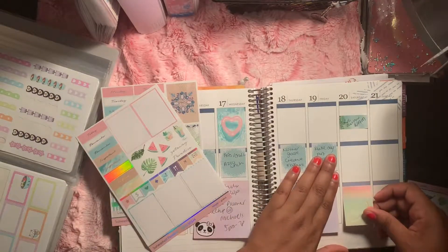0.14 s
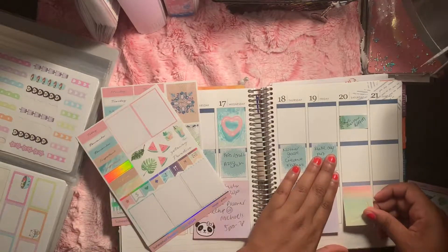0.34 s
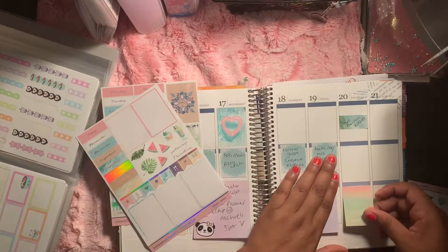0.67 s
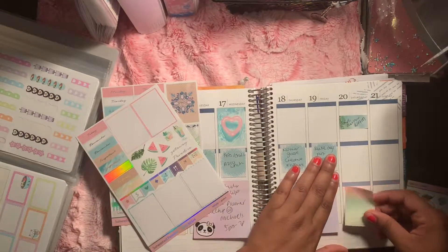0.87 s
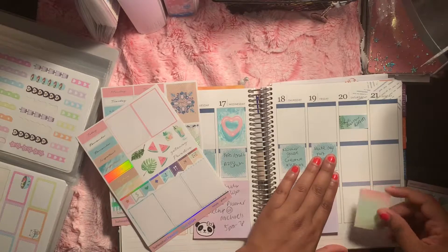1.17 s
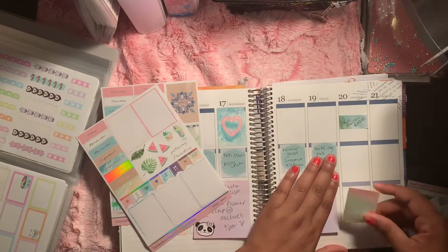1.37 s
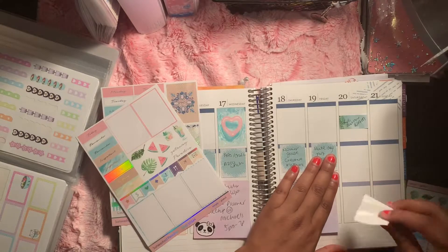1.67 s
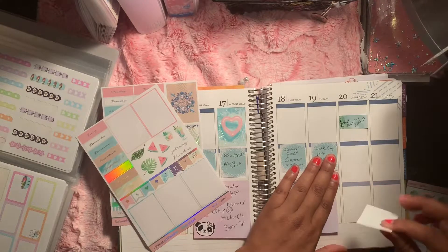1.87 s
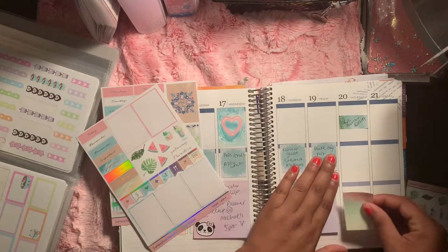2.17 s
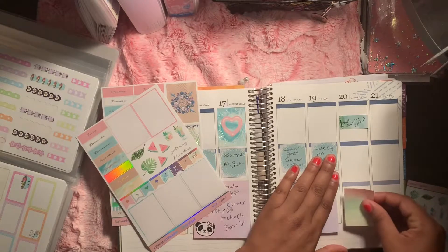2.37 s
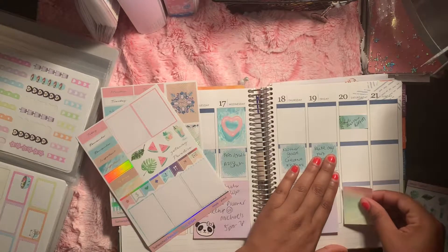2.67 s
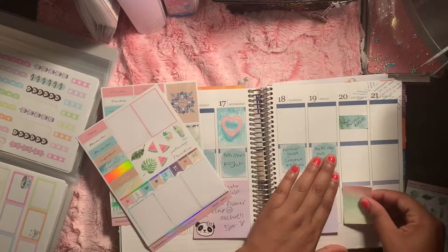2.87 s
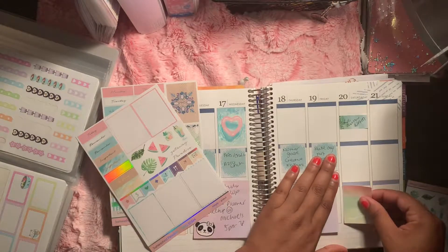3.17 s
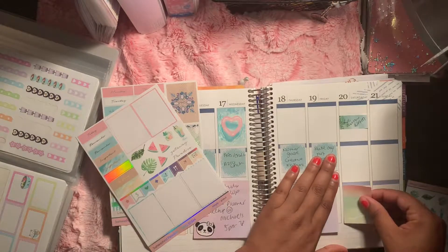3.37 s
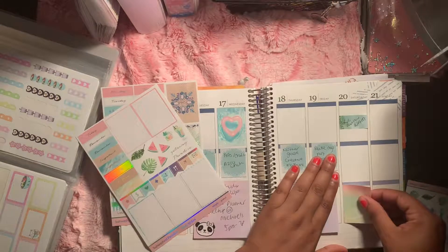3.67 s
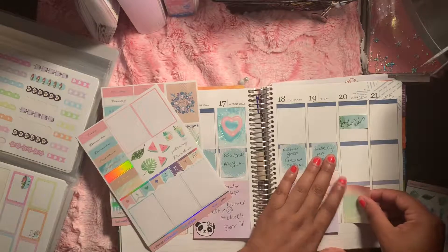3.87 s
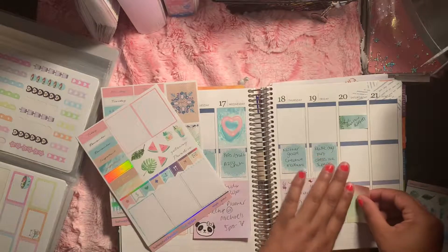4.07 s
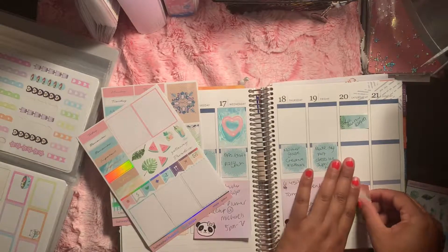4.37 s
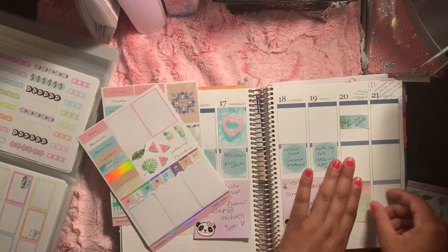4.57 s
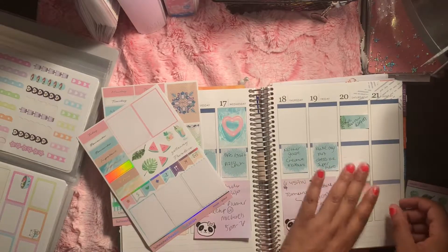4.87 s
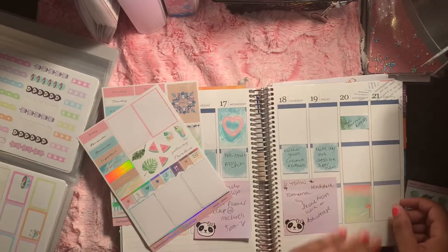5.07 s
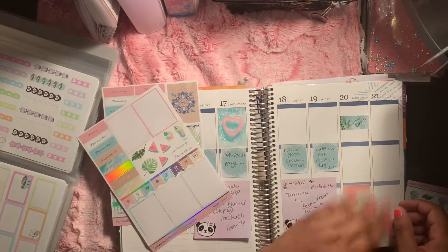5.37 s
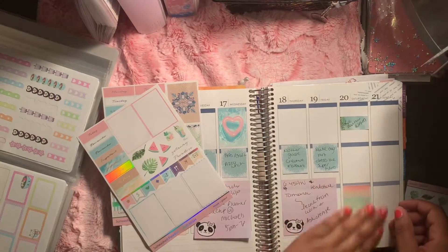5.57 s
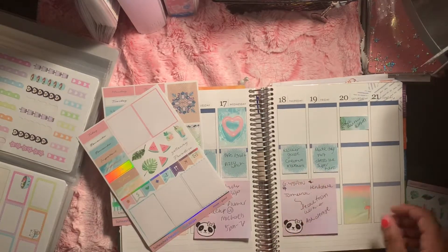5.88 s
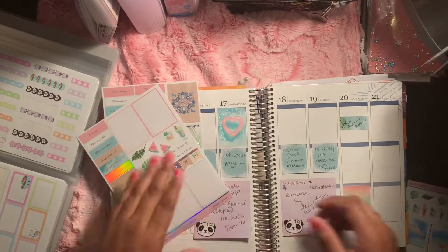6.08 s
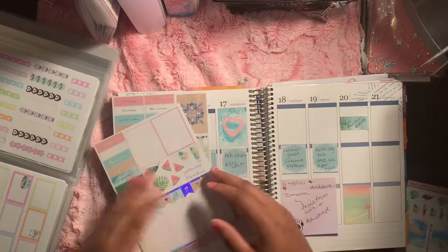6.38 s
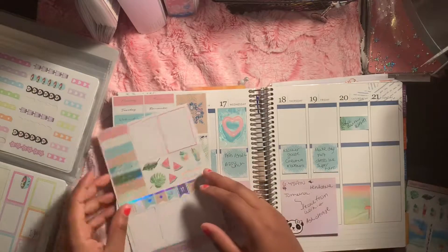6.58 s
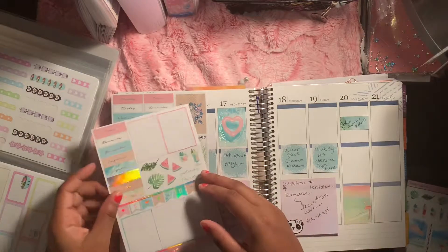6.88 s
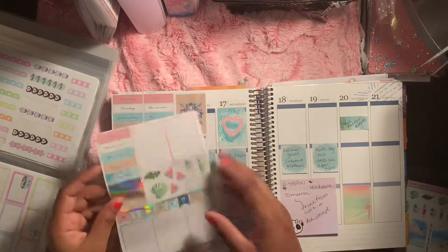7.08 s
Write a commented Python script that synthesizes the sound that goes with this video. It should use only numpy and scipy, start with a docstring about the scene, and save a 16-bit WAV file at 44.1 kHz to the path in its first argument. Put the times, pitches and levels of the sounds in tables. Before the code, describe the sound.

A quiet indoor room with a low, faintly beating motor and mains hum and soft airy room tone; paper is handled close to a stereo microphone, dry with only tiny reflections. Faint ticks at 0.4 and 0.8 s lead to a crisp flick and brief scrape at 1.0. Around 1.65-2.0 a sticker peels with a thin, uneven sticky crackle and a sharp snap at 1.83. Then it is nearly still, with only tiny ticks until about 4. Soft sliding grows from 4.2, and two bright, hard snaps, the loudest ticks, land at 4.5 with a light bump. A smooth palm wipe runs 4.8-5.14, ending in a dull woody pat at 5.15. Another pat at 5.5 starts a shorter wipe, closed by a firmer pat at 5.7. From 6.2 a sheet slides, is lifted and flexed, with rustles, crinkles around 6.76, and hollow card ticks, the last cluster at 7.15.

```python
"""Paper, close up: a sticker is lifted, laid into a planner, smoothed down; then a sticker sheet is picked up.
Slides are filtered slip noise, ticks and crinkles short resonant bursts, peeling glue drives sticker modes.
A flat hand wipes the page twice and pats it three times; its impulses ring damped desk modes.
Behind it a motor and the mains hum together and beat, over the room tone of a quiet room."""
import sys
import numpy as np
from scipy import signal
from scipy.fft import rfft, irfft, next_fast_len
from scipy.io import wavfile

SR = 44100
rng = np.random.default_rng(int(sys.argv[2]) if len(sys.argv) > 2 else 0)


def master(y):
    """Save y as 16-bit WAV."""
    cut = np.clip(np.atleast_2d(y).T, -1, 1)
    pcm = np.round(cut * 32767)  # scale
    wavfile.write(sys.argv[1], SR, pcm.astype(np.int16))


N = 319284
TIME_S = np.arange(N) / SR

# motor turn rate and double, mains, building drone: (frequency [Hz], relative level [dB])
HUM = [(38.1, -65), (49.0, -68), (58.8, -57), (117.42, -60), (120.0, -59), (240.0, -88)]
# room tone spectrum: (frequency [Hz], relative density [dB])
ROOM_TONE = [(20, -14), (32, -7), (45, -1.5), (70, .5), (95, -8.5), (150, -14), (200, -26), (300, -29.5),
             (600, -41), (1200, -47), (2500, -52), (6000, -54.5), (14000, -58)]
HUM_SWELL_S = .075   # all hum partials in phase

# flicked paper edges and fingernails: (time [s], crisp level [dB], hollow card level [dB], card ring [dB],
# crack t60 [s], edge ring [Hz], card ring [Hz], high-pass of the flexing piece [Hz])
TICKS = [(0.412, -50, -65, -63, 0.0068, 5250, 1680, 1290), (0.76, -42, -56, -51, 0.0064, 14900, 1660, 1400),
         (1.026, -27, -43, -31.5, 0.0046, 10600, 2580, 1500),
         (1.029, -57, -44.5, -51, 0.0036, 5800, 1880, 1400),
         (1.222, -50.5, -68, -55, 0.0034, 13300, 2230, 1200),
         (1.833, -24.5, -47, -50.5, 0.015, 14300, 1900, 1390),
         (1.8383, -44, -68, -39.5, 0.0033, 3700, 767, 1000),
         (1.933, -54.5, -64.5, -80, 0.0049, 4200, 2400, 1200), (1.96, -66, -59, -63, .004, 3800, 1270, 496),
         (2.142, -59.5, -72, -57, 0.009, 8500, 2520, 1500),
         (2.653, -80, -58.5, -51, 0.0052, 3500, 1930, 437),
         (2.729, -44.5, -54, -41, 0.011, 8400, 3540, 590),
         (3.072, -57.5, -76, -75, 0.0027, 7200, 2600, 1100),
         (3.951, -56, -74, -74, 0.0022, 7100, 3020, 1500), (4.374, -45, -62.5, -60, .008, 6800, 3470, 2400),
         (4.398, -44.5, -70, -51, 0.0076, 10600, 3300, 1510),
         (4.5082, -16.5, -49, -45, 0.0041, 6750, 1960, 1010),
         (4.5475, -8, -46, -37, 0.0023, 8100, 2100, 880), (4.614, -72.5, -92, -39, 0.0022, 4400, 825, 400),
         (6.169, -52, -60, -65.5, 0.005, 7050, 2300, 1410), (6.653, -70, -80, -48, .004, 4400, 1100, 800),
         (6.705, -36, -53, -48, 0.0063, 6600, 930, 725), (6.748, -65, -53, -42, .004, 6200, 1300, 610),
         (6.7656, -42, -39.5, -30, 0.015, 10100, 2655, 1000),
         (6.808, -41, -52.5, -58, 0.011, 10300, 3100, 1100),
         (6.839, -54, -64, -38.5, 0.004, 6000, 1090, 810),
         (6.878, -69, -49.5, -44.5, .006, 2900, 1960, 500), (7.035, -68, -74, -45, 0.0044, 2400, 900, 700),
         (7.146, -51, -65, -28.5, 0.0055, 7000, 1350, 1000),
         (7.1527, -65, -65, -24.5, 0.0071, 3200, 1030, 700),
         (7.1531, -57, -51, -27, 0.0045, 3200, 1960, 920)]
# crack and card spectra: (frequency [Hz], relative density [dB])
SNAP_SPECTRUM = [(600, -32.5), (1500, -37), (2800, -13.5), (4000, -0.5), (5500, 5.5), (8500, 4), (11500, 3),
                 (15000, 0.5)]
CARD_SPECTRUM = [(150, -1), (400, 14.5), (800, -1), (1800, 1), (2600, -5), (4200, 2), (8000, -58),
                 (15000, -34)]
TICK_T60_S, RELEASE_DB = .03, 11   # weak tail of the crack; instant of release

# paper over paper: (fastest moment [s], rise [s], fall [s], smooth hiss [dB], dry rasp [dB],
# brightness of the hiss [dB], ring of the sheet [Hz])
SLIDES = [(0.885, 0.03, 0.03, -77, -69, 1, 3430), (0.955, 0.055, 0.035, -62.5, -61.5, -14, 2060),
          (1.007, 0.017, 0.017, -43.5, -52, 3, 3500), (1.035, 0.017, 0.074, -63.5, -76, -1, 1860),
          (1.179, 0.024, 0.038, -69.5, -79.5, 1, 2360), (1.315, 0.056, 0.041, -68.5, -88, 9, 3500),
          (1.784, 0.11, 0.13, -61.5, -80, 0, 3820), (1.98, 0.036, 0.029, -70, -65, 6, 3760),
          (2.08, 0.24, 0.082, -79.5, -86, 0, 1990), (4.0, 0.32, 0.18, -76, -98, 7, 3000),
          (4.22, 0.25, 0.21, -72.5, -77, -4, 2966), (4.415, 0.058, 0.064, -55, -71, -6, 3300),
          (4.54, 0.1, 0.11, -48.5, -63.5, -1.5, 1870), (4.73, 0.12, 0.07, -64.5, -69.5, -3, 3000),
          (6.225, .04, .055, -51.5, -60, -2, 2200), (6.28, .075, .048, -47.5, -56, -2, 3500),
          (6.421, 0.077, 0.079, -63, -73.5, -3, 1900), (6.572, 0.026, 0.11, -55, -65, -3, 1500),
          (6.62, 0.051, 0.11, -62.5, -62.5, -7, 4000), (6.763, 0.058, 0.031, -54, -59, -12, 1900),
          (6.872, 0.066, 0.071, -65, -61.5, 14, 1550), (6.985, 0.069, 0.082, -62.5, -60.5, 4, 1880),
          (7.08, 0.075, 0.061, -62.5, -57.5, -9, 3300), (7.135, 0.043, 0.04, -57.5, -64.5, -27, 1400)]
# flat hand wiping: (start [s], length [s], settled hiss [dB], hiss at the start [dB])
WIPES = [(4.794, 0.348, -52.5, -72), (5.476, 0.231, -55.5, -43.5)]
# smooth hiss and dry rasp spectra: (frequency [Hz], relative density [dB])
HISS_SPECTRUM = [(600, -32), (1500, -26), (3000, -16), (4200, -6), (5300, 2), (6200, -1), (7500, -2),
                 (9000, 0), (12500, -4.5), (15700, -2), (17500, -25)]
RASP_SPECTRUM = [(200, -20.5), (500, -8.5), (850, -5), (1200, 1.5), (2000, 0), (2800, 0), (4000, 4.5),
                 (5500, -3), (8000, -14), (15000, -32)]
SLIDE_EDGE_DB, SLIDE_ROUNDNESS = -23, 1.59   # level at ends of rise and fall; 1 = pointed top, 2 = bell
WIPE_ATTACK_S, WIPE_SETTLE_S, WIPE_RELEASE_T60_S = 0.017, 0.065, 0.029
WIPE_RASP_DB, WIPE_BRIGHT_DB = -11.5, 5   # page rasp re hiss; upper re lower part of the hiss
WIPE_RING_HZ = 2400   # page under the hand
SHEET_RING_DB, SHEET_WIDTH_HZ = 10, 340   # ring re rasp; bandwidth
SHEET_BEND = .06   # relative wander of the ring's pitch
CREASES_PER_S, CREASE_DB = 160, -5

# glue letting go: (fastest moment [s], rise [s], fall [s], level [dB], pitch re sticker modes [ratio])
PEELS = [(.955, .05, .04, -73, 1.4), (1.66, 0.062, 0.061, -68.5, 1.03), (1.78, 0.073, 0.055, -54.5, 1.04),
         (1.84, 0.014, 0.058, -59, 0.81), (1.99, 0.022, 0.046, -66.5, .63), (4.575, 0.04, 0.054, -52, 0.99)]
# loose sticker modes: (frequency [Hz], bandwidth [Hz], level [dB])
STICKER_MODES = [(700, 260, -1), (1650, 210, -2), (3605, 300, 5), (3900, 330, 2.5), (5300, 600, -2),
                 (6300, 500, 1.5), (8500, 240, 12), (9800, 730, 6), (13000, 1400, 0)]
STICKER_BEND = .025   # relative wander of pitch

# gripped, bent sheet: (busiest moment [s], rise [s], fall [s], level [dB])
CRINKLES = [(1.01, 0.004, .025, -64.5), (1.975, 0.016, 0.034, -79), (6.25, 0.18, 0.092, -64),
            (6.585, 0.033, 0.091, -66.5), (6.76, 0.034, 0.049, -52.5), (6.866, 0.058, 0.041, -59),
            (7.02, 0.073, 0.1, -62)]
CRINKLES_PER_S, CRINKLE_SPREAD_DB = 200, 3.5   # median rate; size spread

# hand parts or sheet edge landing on the planner: (time [s], thud [dB], slap [dB], contact time [s])
CONTACTS = [(4.125, -61.5, -64, 0.0028), (4.303, -49.5, -77, 0.0043), (4.511, -49.5, -84, 0.0032),
            (4.548, -54.5, -44.5, .00063), (4.811, -67, -62, 0.0014), (5.121, -49.5, -37, 0.0024),
            (5.134, -38.5, -40, 0.0026), (5.148, -33, -58, 0.0064), (5.485, -60, -41.5, 0.00058),
            (5.49, -30.5, -41.5, 0.0027), (5.502, -44, -36, 0.0011), (5.512, -32.5, -44, 0.014),
            (5.6862, -37.5, -34, 0.00033), (5.6986, -31, -37.5, 0.0016), (5.71, -26.5, -41.5, 0.0041),
            (7.15, -48, -43, 0.0002)]
# desk modes damped by the pages: (frequency [Hz], level [dB], t60 [s])
DESK_MODES = [(37.6, -22.5, 0.43), (57, -11.5, .2), (74, -3, 0.12), (121.3, -11.5, 0.26),
              (145.1, -4.5, 0.22), (181.3, -9, 0.12), (225, -13, 0.23), (270, -13, 0.11), (312, -3, 0.15),
              (353.5, -10.5, 0.19), (400.6, -9.5, 0.19), (451.4, -4, 0.1), (477, -5.5, .1),
              (640, -13.5, .04), (755, -12.5, .05), (1058, -3.5, 0.13), (1230, -8, 0.088),
              (1320, -13.5, 0.072), (1500, -10, .04)]
# dead thump of the page cushion: (frequency [Hz], level [dB], t60 [s])
PAGE_STACK = (330, 0, .022)
# slap spectrum: (frequency [Hz], relative density [dB])
SLAP_SPECTRUM = [(100, 4), (400, 5), (700, -1.5), (1200, -4), (1900, -11.5), (3100, -16.5), (4200, -15),
                 (7000, -18), (15000, -27.5)]
STRIKE_SPREAD_DB = 1.5   # mode levels, landing to landing
RUB_DB = -53.5   # desk shaken by the wiping hand, re its hiss

# desk top and nearby boxes: (delay [s], level [dB])
ECHOES = [(.0013, -27.5), (.00325, -24), (.0054, -32), (.0098, -16.5)]
ROOM_T60_S, ROOM_WET_DB = 0.041, -13
# lead of the left microphone over the right: (frequency [Hz], phase [rad])
MIC_PHASE = [(0, 0), (80, -.02), (150, -.1), (600, -.3), (900, -.8), (1100, -.1), (1600, 0), (3000, 1.3),
             (4850, 3.14), (9050, 9.42), (17400, 22)]
CUTOFF_HZ = 16200


def from_db(db):
    """Amplitude ratio of a level in dB."""
    return 10 ** (np.asarray(db) / 20)


def rms_one(x):
    """Scale to an rms of 1."""
    return x / np.sqrt(np.mean(x ** 2) + 1e-20)


def fade(t_s, t60_s):
    """Exponential decay by 60 dB in t60."""
    return np.exp(-np.log(1000) * t_s / t60_s)


def drift(knots_per_s):
    """Slow random wander: unit-spread Gaussian knots joined by lines."""
    knots = rng.standard_normal(N)
    return np.interp(TIME_S * knots_per_s, np.arange(N), knots)


def high_pass(x, hz):
    """Second-order Butterworth high-pass."""
    return signal.sosfilt(signal.butter(2, hz, "high", fs=SR, output="sos"), x)


def colour(x, spectrum):
    """Causal minimum-phase filter that follows a spectrum and keeps the power of white noise."""
    size = 2 * next_fast_len(N // 2 + 8192)
    hz, level_db = np.transpose(spectrum)
    grid_hz = np.arange(size // 2 + 1) * SR / size
    gain = rms_one(from_db(np.interp(np.log(grid_hz + 1), np.log(hz), level_db)))
    # folded cepstrum gives minimum phase
    cepstrum = irfft(np.log(gain))
    cepstrum[1:size // 2] *= 2
    cepstrum[size // 2 + 1:] = 0
    response = np.exp(rfft(cepstrum))
    return irfft(rfft(x, size) * response)[..., :N]


def ring(force, hz, t60_s):
    """Damped mode: a unit impulse starts a decaying sine of height 1."""
    r, w = fade(1 / SR, t60_s), 2 * np.pi * hz / SR
    return signal.lfilter([0, np.sin(w)], [1, -2 * r * np.cos(w), r * r], force + 1e-18)


def resonate(x, hz, width_hz):
    """Band-pass resonance with a peak gain of about 1."""
    r = np.exp(-np.pi * width_hz / SR)
    zeros = np.array([1, 0, -1]) * (1 - r * r) / 2
    poles = [1, -2 * r * np.cos(2 * np.pi * hz / SR), r * r]
    return signal.lfilter(zeros, poles, x)


def add(track, s, sound):
    """Mix a sound into the track in place, its middle at time s."""
    start = round(s * SR) - len(sound) // 2
    track[start:start + len(sound)] += sound[:N - start]


def burst(rise_t60_s, t60_s, tail_db, tail_t60_s):
    """Brief graze, then a noise flurry that dies fast over a weaker, slower tail."""
    t_s = np.arange(-SR // 4, SR // 4) / SR
    graze = from_db(-13.0) * fade(abs(t_s), rise_t60_s)
    flurry = fade(abs(t_s), t60_s) + from_db(tail_db) * fade(abs(t_s), tail_t60_s)
    return rng.standard_normal(len(t_s)) * np.where(t_s < 0, graze, flurry)


def friction(per_s, spread_db, flutter_db):
    """Paper fibres catch and let go: random slips of uneven size under a wavering pressure."""
    slips = (rng.random(N) < per_s / SR) * rng.standard_normal(N)
    sizes = from_db(spread_db * np.minimum(rng.exponential(1, N), 5))
    pressure = from_db(flutter_db * drift(82))
    return rms_one(slips * sizes * pressure)


def flexing(x, depth_db, knots_per_s):
    """A held sheet bends: its resonances swell and fade independently."""
    peaks = np.zeros(N)
    for k, hz in enumerate(np.geomspace(600, 6500, 14)):
        swell = from_db(depth_db * drift(knots_per_s))
        peaks += (-1) ** k * swell * resonate(x, hz, width_hz=hz * 0.34)
    return rms_one(0.16 * x + peaks)


def slide_envelope(peak_s, rise_s, fall_s):
    """A slide swells to its fastest moment and dies away."""
    away = np.maximum((peak_s - TIME_S) / rise_s, (TIME_S - peak_s) / fall_s)
    near = away < 3
    envelope = np.zeros(N)
    envelope[near] = from_db(SLIDE_EDGE_DB * away[near] ** SLIDE_ROUNDNESS)
    return envelope


def wipe_envelope(start_s, length_s, settled_db, start_db):
    """The hand touches down, settles to an even speed and stops."""
    t_s = np.maximum(TIME_S - start_s, 0)
    level = from_db(settled_db + (start_db - settled_db) * np.exp(-t_s / WIPE_SETTLE_S))
    attack = np.minimum(t_s / WIPE_ATTACK_S, 1)
    release = fade(np.clip(t_s - length_s, 0, 1), WIPE_RELEASE_T60_S)
    return level * attack * release


def background():
    """Motor's second harmonic beats against the mains, over a rumble and a faint airy hiss."""
    hum = np.zeros(N)
    for hz, db in HUM:
        hum += np.sqrt(2) * from_db(db) * np.sin(2 * np.pi * hz * (TIME_S - HUM_SWELL_S))
    diffuse = high_pass(rng.standard_normal((2, N)), 500)   # independent sides
    air = colour(rng.standard_normal(N) + from_db(3.5) * diffuse, ROOM_TONE)
    return from_db(-1.5) * hum + from_db(-58.5) * air


def ticks():
    """A bent edge snaps free with a sharp crack and the card shudders; smaller pieces sound thinner."""
    crisp, hollow = np.zeros((2, N))
    for s, crisp_db, hollow_db, ring_db, crack_t60_s, edge_hz, card_hz, lowest_hz in TICKS:
        crack = burst(rise_t60_s=0.014, t60_s=crack_t60_s, tail_db=-21.5, tail_t60_s=TICK_T60_S)
        crack[len(crack) // 2] = from_db(RELEASE_DB)
        edge = 2.0 * resonate(crack, edge_hz, width_hz=860)
        add(crisp, s, from_db(crisp_db) * (crack + edge))
        shudder = burst(rise_t60_s=0.04, t60_s=0.025, tail_db=-20.5, tail_t60_s=0.23)
        body = from_db(hollow_db) * high_pass(shudder, lowest_hz)
        card_ring = from_db(ring_db) * resonate(shudder, card_hz, width_hz=138)
        add(hollow, s, body + card_ring)
    return from_db(-6.0) * colour(crisp, SNAP_SPECTRUM) + from_db(5.5) * colour(hollow, CARD_SPECTRUM)


def sliding():
    """Skin and paper hiss as they slide; paper also rasps lower, crackles, and rings as gripped."""
    strokes = [(slide_envelope(s, rise_s, fall_s), *sound) for s, rise_s, fall_s, *sound in SLIDES]
    # wipe envelopes already carry the hiss level
    strokes += [(wipe_envelope(*wipe), 0, WIPE_RASP_DB, WIPE_BRIGHT_DB, WIPE_RING_HZ) for wipe in WIPES]

    creases = from_db(CREASE_DB) * friction(per_s=CREASES_PER_S, spread_db=2.0, flutter_db=-0.5)
    slips = friction(per_s=5000, spread_db=0.0, flutter_db=0.2)
    grain = flexing(colour(slips + creases, RASP_SPECTRUM), depth_db=1.0, knots_per_s=22)
    # bending makes the ring's pitch wander
    bent_time_s = np.cumsum(1 + SHEET_BEND * drift(20)) / SR % TIME_S[-1]

    low_power, high_power, rasp = np.zeros((3, N))
    for envelope, hiss_db, rasp_db, bright_db, ring_hz in strokes:
        # brightness splits a constant sum of power gains between the two bands
        power, tilt = envelope ** 2, from_db(bright_db) ** 2
        lower = from_db(hiss_db) ** 2 * 2 / (1 + tilt)
        low_power += lower * power
        high_power += lower * tilt * power
        sheet_ring = np.interp(bent_time_s, TIME_S, resonate(grain, ring_hz, SHEET_WIDTH_HZ))
        rasp += from_db(rasp_db) * envelope * rms_one(grain + from_db(SHEET_RING_DB) * sheet_ring)

    hiss = colour(friction(per_s=12000, spread_db=0.0, flutter_db=2.0), HISS_SPECTRUM)
    low = signal.sosfiltfilt(signal.butter(3, 9500, fs=SR, output="sos"), hiss)
    return np.sqrt(low_power) * low + np.sqrt(high_power) * (hiss - low) + rasp


def peeling():
    """Glue strands part in uneven slips and excite the sticker, whose pitch wanders as it curls."""
    slips = friction(per_s=2800, spread_db=1.0, flutter_db=2.5)
    song = np.zeros(N)
    for k, (hz, width_hz, db) in enumerate(STICKER_MODES):
        song += (-1) ** k * from_db(db) * resonate(slips, hz, width_hz)
    song = rms_one(song)
    curl_s = np.cumsum(1 + STICKER_BEND * drift(15)) / SR
    peels = np.zeros(N)
    for s, rise_s, fall_s, db, pitch in PEELS:
        pitched = np.interp(curl_s * pitch % TIME_S[-1], TIME_S, song)
        peels += from_db(db) * slide_envelope(s, rise_s, fall_s) * pitched
    return peels


def crinkling():
    """Small patches of the sheet buckle in clumps, each ringing briefly at one of 16 pitches."""
    born = rng.random(N) < CRINKLES_PER_S * from_db(4 * drift(45)) / SR
    sizes = from_db(CRINKLE_SPREAD_DB * np.minimum(rng.exponential(1, N), 3))
    snaps = born * rng.choice([-1, 1], N) * sizes
    pitches_hz = np.geomspace(750, 6000, 16)
    dealt = rng.integers(0, len(pitches_hz), N)
    crackle = np.zeros(N)
    for k, hz in enumerate(pitches_hz):
        crackle += resonate(snaps * (dealt == k) + 1e-18, hz, width_hz=hz * 0.18) / np.sqrt(hz)
    level = sum(from_db(db) * slide_envelope(s, rise_s, fall_s) for s, rise_s, fall_s, db in CRINKLES)
    return rms_one(crackle) * level


def pats():
    """Each landing slaps the page and pushes the desk at another spot, so the modes ring differently."""
    forces, slap = np.zeros((len(DESK_MODES), N)), np.zeros(N)
    t_s = np.arange(-SR // 50, SR // 50) / SR
    spots_db = STRIKE_SPREAD_DB * rng.standard_normal((len(CONTACTS), len(DESK_MODES)))
    for (s, thud_db, slap_db, contact_s), spot_db in zip(CONTACTS, spots_db):
        push = np.sin(np.pi * np.clip(t_s / contact_s, 0, 1)) * fade(abs(t_s), contact_s)
        push /= push.sum()
        for force, mode_db in zip(forces, spot_db):
            add(force, s, from_db(thud_db + mode_db) * push)
        smack = burst(rise_t60_s=.01, t60_s=.036, tail_db=-18, tail_t60_s=.24)
        add(slap, s, from_db(slap_db) * smack)

    rub = from_db(RUB_DB) * sum(wipe_envelope(*wipe) for wipe in WIPES) * rng.standard_normal(N)
    thud = np.zeros(N)
    for k, (hz, db, t60_s) in enumerate(DESK_MODES):
        thud += (-1) ** (k // 2) * from_db(db) * ring(forces[k] + rub, hz, t60_s)
    stack_hz, stack_db, stack_t60_s = PAGE_STACK
    thump = from_db(stack_db) * ring(forces.mean(axis=0), stack_hz, stack_t60_s)
    # the desk's slowest motion radiates poorly
    return high_pass(thud + thump + colour(slap, SLAP_SPECTRUM), 38)


def reflections(x):
    """Hard things close by throw the sound back within milliseconds."""
    return sum(from_db(db) * np.interp(TIME_S - delay_s, TIME_S, x, left=0) for delay_s, db in ECHOES)


def room(x):
    """Diffuse reflections: decaying noise, independent at each side, bass left out."""
    t_s = TIME_S[:SR // 2]
    tail = rng.standard_normal((2, len(t_s))) * fade(t_s, ROOM_T60_S) * (t_s > .004)
    tail /= np.sqrt(np.sum(tail ** 2, axis=1)[:, None])
    return signal.fftconvolve(high_pass(x, 350)[None], tail, axes=1)[:, :N]


def scene():
    """Paper and hand with reflections and room, over the background; the pats get no early echoes."""
    rustle = ticks() + sliding() + peeling() + crinkling()
    paper = rustle + reflections(rustle) + pats()
    return paper + from_db(ROOM_WET_DB) * room(paper) + background()


def record(dry):
    """Stereo microphone: the right side's phase shifts with frequency, most in the treble; top cut."""
    phase_rad = np.interp(np.arange(N // 2 + 1) * SR / N, *np.transpose(MIC_PHASE))
    right = irfft(rfft(dry[1]) * np.exp(-1j * phase_rad), N)
    top_cut = signal.ellip(10, .3, 70, CUTOFF_HZ, fs=SR, output="sos")
    return signal.sosfilt(top_cut, [dry[0], right])


dry = scene()
out = record(dry)
master(out)
```